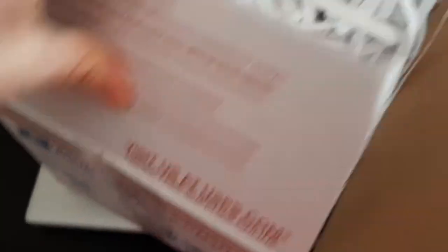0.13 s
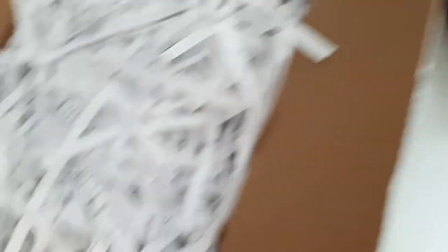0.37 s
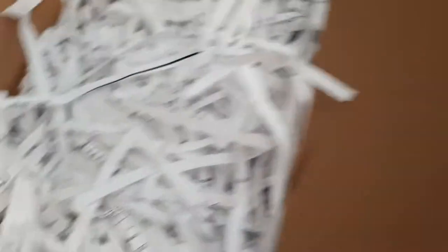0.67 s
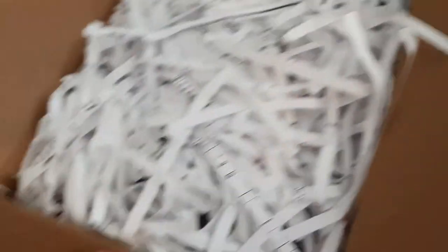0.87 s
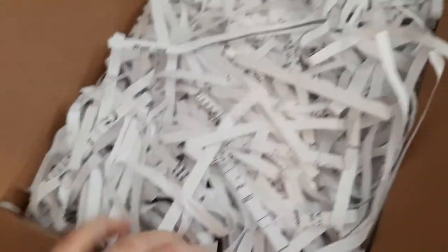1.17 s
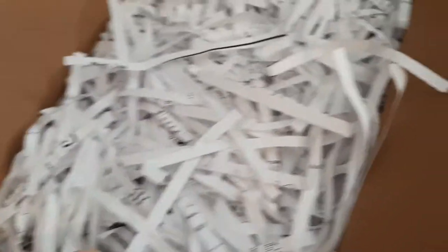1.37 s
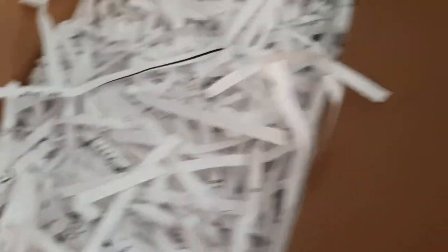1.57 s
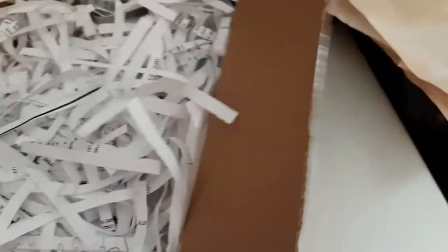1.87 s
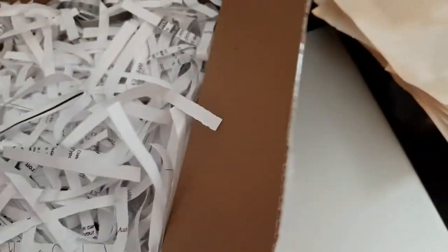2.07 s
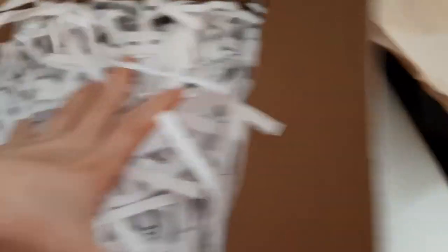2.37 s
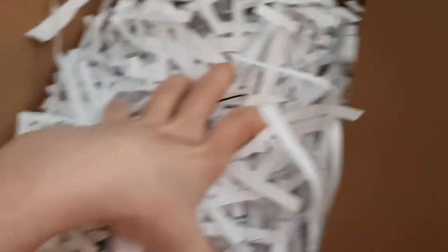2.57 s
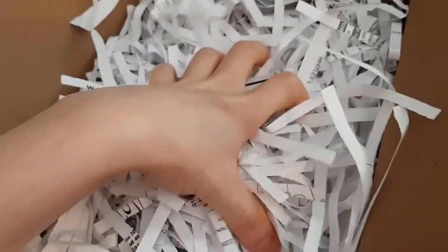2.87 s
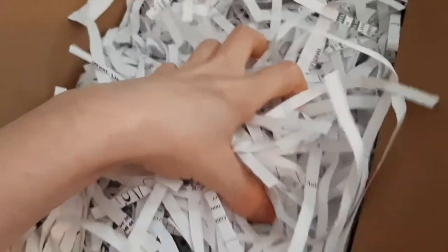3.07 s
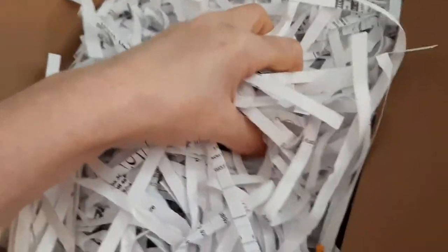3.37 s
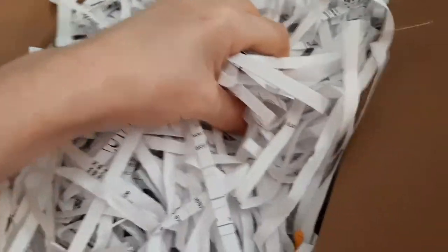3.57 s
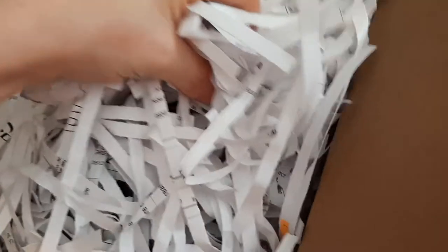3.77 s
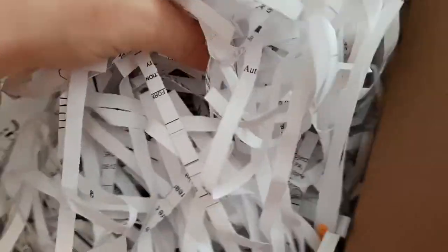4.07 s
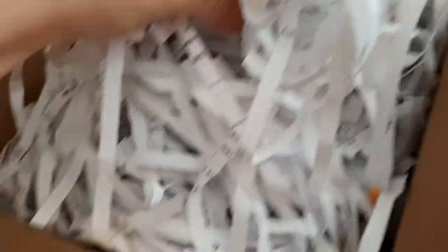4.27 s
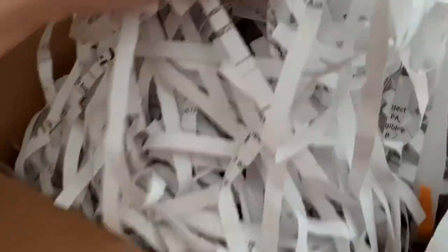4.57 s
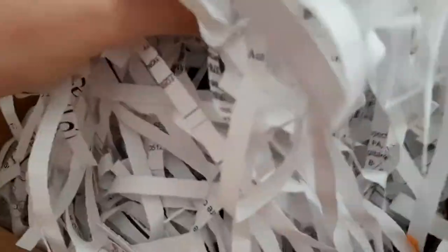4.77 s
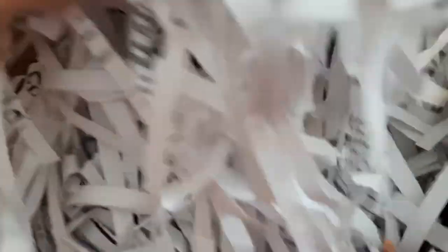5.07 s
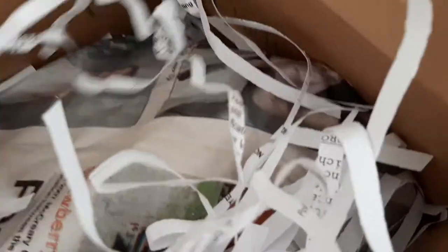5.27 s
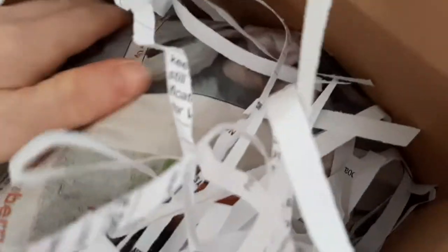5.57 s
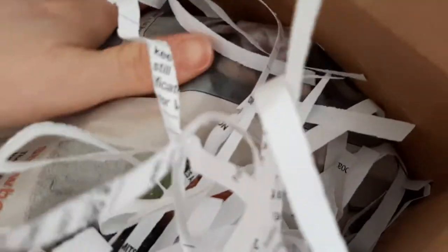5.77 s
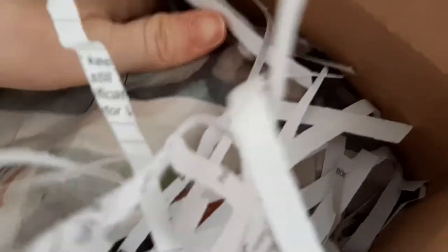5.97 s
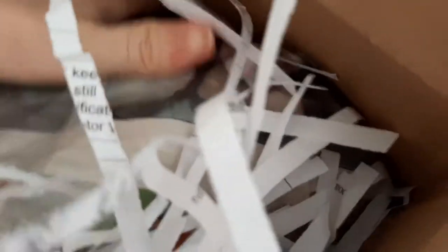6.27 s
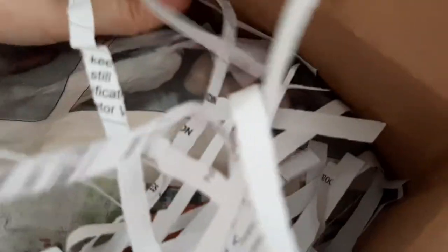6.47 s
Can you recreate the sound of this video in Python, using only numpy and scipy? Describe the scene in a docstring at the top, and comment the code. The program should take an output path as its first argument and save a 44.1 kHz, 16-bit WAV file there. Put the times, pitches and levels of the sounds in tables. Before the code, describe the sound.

Very close stereo sound of shredded paper handled in a cardboard box indoors. Brief swishes and soft box bumps come first, with quiet gaps; then fuller rustling, fizzing strip edges and crinkles peak through the middle. A bright loud snap marks the paper pulled aside, and the ending is coarser: low-pitched crackles, hollow wall knocks, deep thuds and handling rumble, leaning left. No echoing space.

```python
"""A hand digs through shredded paper in a cardboard box it has opened, close to a hand-held stereo microphone.
Strips slip over each other as dense clicks (fizz), buckle as short rings (crinkle) and snap as pitched bursts.
The box walls ring when rubbed and knocked, and deep thuds sound as the box shifts. Filtered noise makes the
low rumble of grip and sliding box, and the quiet room; close reflections surround paper and box."""
import sys
import numpy as np
from scipy import signal
from scipy.fft import rfft, irfft, next_fast_len
from scipy.io import wavfile
from scipy.ndimage import uniform_filter1d

SR = 44100
rng = np.random.default_rng(int(sys.argv[2]) if len(sys.argv) > 2 else 0)


def int16_out(signal):
    """Quantize to a 16-bit WAV file."""
    q = np.round(np.clip(np.atleast_2d(signal).T, -1, 1) * 32767)
    wavfile.write(sys.argv[1], SR, q.astype(np.int16))


N = 292383
T = np.arange(N) / SR

# modes of the cardboard walls when rubbed: hz, width_hz, level_db (relative)
WALL_MODES = [(353, 89, -0.5), (384, 50.3, 2), (411, 58, -0.5), (525, 93, 1.5), (567, 125, 1),
              (708, 70, -10.5), (858, 91, -6), (1166, 83, -4), (1580, 250, 3.5), (2210, 160, -6.5)]


def gain_of(db):
    """Decibels to gain."""
    return 10 ** (np.asarray(db) / 20)


def strokes():
    """Each stroke swells, holds and fades; squeeze and load follow the strongest of the moment."""
    # the hand overall: time_s, stirring between strokes rest_db, left over right lean_db, buckle_hz
    hand = [(0.0, -69, -5.5, 1370), (0.3, -82.5, -1, 1380), (0.62, -71, 4, 2400), (0.9, -73, -4, 2750),
            (1.05, -80, 2.5, 1500), (1.33, -64, -3, 1380), (1.72, -76.5, 3.5, 1910), (2.2, -70, 5, 2400),
            (2.7, -57, -0.5, 2270), (3.5, -43, -1, 2220), (3.8, -53.5, 0.5, 1970), (4.25, -72, -1, 1700),
            (4.9, -60.5, -1, 1710), (5.2, -55.5, 0.5, 2860), (5.5, -49, 5.5, 1600), (5.9, -53.5, 5, 1250),
            (6.63, -50, 6, 1630)]
    # strokes of the hand: full force start_s, hold_s, stirring level_db, swell_db_per_s, fade_db_per_s,
    # squeeze_db that makes strips buckle, load_db on the box walls
    stroke_list = [(0.386, .06, -66.5, 201.5, 100, -14, 17.5), (0.521, 0.022, -54, 115, 260, -3, 0.5),
                   (0.656, 0.0096, -51.5, 181, 144, -18, -5.5), (0.866, 0.067, -43.5, 133, 200, -2.5, -16),
                   (1.045, 0.017, -44.5, 116, 311, -1, 3.5), (1.248, .03, -53, 153, 75, -10, 1.5),
                   (1.407, 0.017, -58.5, 102, 100, 13, -0.5), (1.513, 0.024, -56, 80, 194, -15, -8),
                   (1.566, .002, -45.5, 130, 370, -4, 4), (1.905, 0.032, -55, 105, 196, -24, -6),
                   (1.977, 0.014, -49.5, 104, 550, 0, -0.5), (2.306, 0.045, -57, 187, 100, -15, -27),
                   (2.388, 0.22, -51, 128, 96, -2.5, -1.5), (2.659, .002, -42.5, 95, 400, -5, -8.5),
                   (2.806, .002, -40, 174, 212, -3.5, -8), (2.857, 0.23, -46, 98, 100, -2, -3.5),
                   (3.254, 0.079, -39, 89, 152, 1, -2.5), (3.432, .002, -37.5, 80, 300, 1, -0.5),
                   (3.487, 0.14, -44, 194, 200, 2, -2), (3.673, 0.015, -41.5, 124, 150, 3.5, 4.5),
                   (3.736, 0.1, -38.5, 150, 125, 7, -1.5), (3.989, 0.092, -39, 552, 103, 3, 0.5),
                   (4.48, .01, -45, 23.5, 195, 1, 2), (4.668, 0.038, -41, 146, 89, 5, 3.5),
                   (4.785, 0.13, -48, 91, 120, -2.5, 0.5), (5.035, 0.079, -39.5, 263, 354, -3, -4.5),
                   (5.156, 0.02, -34.5, 600, 720, -1, -1), (5.193, .09, -43, 200, 260, -11, -2),
                   (5.47, 0.21, -45.5, 106, 100, -0.5, 2.5), (5.77, 0.053, -52.5, 105, 117.5, 12.5, 14),
                   (6.038, .002, -46.5, 111, 152, 12, 7), (6.184, 0.086, -45, 92, 262, 6, 2),
                   (6.39, 0.056, -43, 135, 120, 7, 5.5), (6.54, .002, -47, 350, 98, 10.5, 5)]
    rest_squeeze_db, rest_load_db = -2.5, 3.5  # between strokes

    t = T[::32]
    time_s, *curves = np.transpose(hand)
    rest_db, lean_db, buckle_hz = (np.interp(t, time_s, c) for c in curves)
    start_s, hold_s, level_db, swell, fade, squeeze_db, load_db = np.transpose(stroke_list)[:, :, None]

    before_s = np.maximum(start_s - t, 0)
    after_s = np.maximum(t - start_s - hold_s, 0)
    power = gain_of(2 * (level_db - swell * before_s - fade * after_s))
    rest = gain_of(2 * rest_db)
    total = power.sum(axis=0) + rest

    # averages weighted by power
    squeeze = ((power * squeeze_db).sum(axis=0) + rest * rest_squeeze_db) / total
    load = ((power * load_db).sum(axis=0) + rest * rest_load_db) / total
    stir_db = 10 * np.log10(total)
    return [np.interp(T, t, c) for c in (stir_db, squeeze, load, lean_db, buckle_hz)]


STIR_DB, SQUEEZE_DB, LOAD_DB, LEAN_DB, BUCKLE_HZ = strokes()


def evened(x):
    """Scales to an rms of one, over both channels together."""
    return x / np.sqrt(np.mean(x ** 2) + 1e-20)


def colour(x, points):
    """Filters by a spectrum drawn on a log-frequency axis."""
    size = next_fast_len(N)
    point_hz, point_db = np.transpose(points)
    hz = np.fft.rfftfreq(size, 1 / SR)
    db = np.interp(np.log(hz + 1), np.log(point_hz + 1), point_db)
    return irfft(rfft(x, size) * gain_of(db), size)[..., :N]


def ring(x, hz, width_hz):
    """One mode: a click of height one starts a dying sine of height one."""
    r, w = np.exp(-np.pi * width_hz / SR), 2 * np.pi * hz / SR
    return signal.lfilter([0, np.sin(w)], [1, -2 * r * np.cos(w), r * r], x)


def sides(lean_db):
    """Left and right gains, lean_db apart."""
    return gain_of(np.array([lean_db / 2, -lean_db / 2]))


def clumps(seconds):
    """Slow chance of unit spread: paper gives way in bunches."""
    size = max(round(seconds * SR), 2)
    once = uniform_filter1d(rng.standard_normal(N), size)
    return evened(uniform_filter1d(once, size))


def gives(per_s, fade_s):
    """Bunches of strips let go suddenly and settle slowly."""
    starts = (rng.random(N) < per_s / SR) * np.minimum(rng.exponential(1, N), 3)
    return signal.lfilter([1], [1, -np.exp(-1 / (fade_s * SR))], starts)


def slips(per_s, spread_db, clump_db, clump_s, reach_s):
    """Clicks at scattered places: each reaches the two microphones at its own small time difference."""
    chance, strength, sign, place = rng.random((4, N))
    at = np.flatnonzero(chance < per_s / SR)
    size_db = spread_db * np.minimum(-np.log(strength + 1e-9), 5) + clump_db * clumps(clump_s)
    size = (gain_of(size_db) * np.sign(sign - .5))[at]

    # the left, nearer the paper, tends to hear it first
    lag_s = reach_s * (2 * place[at] - 1) + 1e-4 + 2e-5 * LEAN_DB[at]
    right_at = np.clip(at + np.round(lag_s * SR).astype(int), 0, N - 1)
    out = np.zeros((2, N))
    out[0, at] = size
    np.add.at(out[1], right_at, size)
    return out


def fizz():
    """Countless strip edges sliding: dense tiny clicks, each frequency band in its own bunches."""
    # colour of the sliding edges: hz, level_db (per Hz, relative)
    fizz_spectrum = [(300, -16), (1000, -9), (2000, -6), (4000, -4.5), (7000, -3), (16000, 5)]
    # level of the top treble band: time_s, level_db
    sheen = [(0.3, 1), (.75, -4.5), (.95, -8), (1.1, -1), (5.4, -0.5), (6.0, -4.5)]

    shared = 1 + 0.81 * gives(60, fade_s=0.0026)
    out = np.zeros((2, N))
    for low_hz, high_hz in [(300, 3000), (3000, 6000), (6000, 10500), (10500, 18000)]:
        edges = slips(5000, spread_db=2.5, clump_db=1.5, clump_s=0.0068, reach_s=2.5e-4)
        band_filter = signal.butter(2, [low_hz, high_hz], "bandpass", fs=SR, output="sos")
        band = signal.sosfilt(band_filter, evened(edges))
        if low_hz > 8000:  # only the finest edges
            band *= gain_of(np.interp(T, *np.transpose(sheen)))
        out += band
    return gain_of(STIR_DB + 3.5) * evened(colour(shared * out, fizz_spectrum))


def crinkle():
    """Buckling strips: short rings, each strip at its own pitch, loudest near the buckling pitch."""
    out = np.zeros((2, N))
    for hz in np.geomspace(1100, 5200, num=12):
        near = gain_of(-3.0 * np.log2(hz / BUCKLE_HZ) ** 2) + 0.052
        near = near * (hz / 2000) ** 0.36
        bends = slips(400, spread_db=2.0, clump_db=4.0, clump_s=0.0054, reach_s=0.00021)
        rings = ring(ring(bends, hz, 0.28 * hz), hz, 0.28 * hz)  # twice: a soft start
        out += near * evened(rings)
    return gain_of(STIR_DB + SQUEEZE_DB - 6.0) * evened(out)


def snaps():
    """Each snap is a brief burst ringing at the strip's pitch, with a wide tick and some sizzle."""
    # single strips snapping: start_s, level_db, pitch_hz
    snap_list = [(0.7814, -40, 4000), (1.3114, -43, 5600), (1.522, -33.5, 2130), (1.556, -24, 7540),
                 (1.9769, -21.5, 1880), (2.48, -37, 8000), (2.732, -28.5, 2550), (2.7981, -22, 7640),
                 (2.9374, -26, 9000), (2.943, -25, 9000), (2.997, -27, 2660), (3.0812, -31, 4500),
                 (3.0837, -28, 3240), (3.251, -27, 3300), (3.299, -28, 2930), (3.3456, -28, 2900),
                 (3.3599, -35, 4200), (3.3973, -24.5, 2200), (3.4288, -25, 1770), (3.5956, -28, 3200),
                 (3.683, -20, 7150), (3.734, -23.5, 1590), (3.8319, -27, 2080), (3.8463, -27, 7300),
                 (3.9884, -30, 9100), (4.0717, -30, 1530), (4.4224, -41, 8000), (4.44, -28, 2870),
                 (4.6358, -32, 2330), (4.6963, -31, 1660), (4.956, -36.5, 1550), (5.0994, -27, 4400),
                 (5.119, -30, 8000), (5.1606, -11, 5260), (5.206, -31, 2210), (5.3897, -25.5, 2620),
                 (5.501, -23.5, 3850), (5.6281, -27, 4020), (6.0332, -22, 1210), (6.04, -25.5, 4500),
                 (6.0732, -20, 1670), (6.132, -30.5, 1300), (6.246, -28, 1050), (6.275, -22, 1630),
                 (6.2891, -26, 4000), (6.3534, -30.5, 1070), (6.3718, -23.5, 3530), (6.396, -26.5, 925),
                 (6.407, -19, 2140), (6.4268, -23, 1650), (6.4417, -25, 4430), (6.4537, -25.5, 7650),
                 (6.501, -33, 5900), (6.5357, -26, 1480), (6.5923, -26, 2670)]
    tick_db, sizzle_db = -5.0, -9.0  # against the ring of the strip
    sizzle_db_per_octave = 8.0  # lower strips sizzle less, below 2600 Hz

    out, t = np.zeros((2, N + 1000)), np.arange(600) / SR
    burst = (t / .0008) ** 1.88 * np.exp(-t / 0.0005)
    noises = rng.standard_normal((len(snap_list), 3, 600))
    for (start_s, level_db, hz), noise in zip(snap_list, noises):
        shake = (noise[2] + 0.19 * noise[:2]) * burst  # nearly alike in both microphones
        flex = np.diff(shake, prepend=0)  # a thin strip radiates no bass
        body = ring(ring(flex, hz, .5 * hz), hz, .5 * hz)
        tick = ring(flex, 6200, 3400)
        sizzle = np.diff(shake, n=2, prepend=0, append=0)

        pitch_db = sizzle_db_per_octave * min(np.log2(hz / 2600), 0)
        parts = [(0, body), (tick_db, tick), (sizzle_db + pitch_db, sizzle)]
        snap = sum(gain_of(db) * x / abs(x).max(axis=1, keepdims=True) for db, x in parts)
        snap = snap / abs(snap).max(axis=1, keepdims=True)

        lean_db = LEAN_DB[round(start_s * SR)]
        right_lag = max((0.000066 + 2e-5 * lean_db) * SR, -20)  # samples
        for ear in range(2):
            i = round(start_s * SR + ear * right_lag)
            out[ear, i:i + 600] += sides(lean_db)[ear] * gain_of(level_db) * snap[ear]
    return out[:, :N]


def hollow(x):
    """The air in the box rings along with the paper."""
    # modes of the air inside the box: hz, width_hz, level_db
    air_modes = [(1579, 45, 1.5), (2080, 31, 0), (2980, 97, -9)]
    return x + sum(gain_of(db) * 2 * np.pi * w / SR * ring(x, hz, w) for hz, w, db in air_modes)


def wall_rub():
    """The paper mass rubs the walls and excites each mode in its own bunches."""
    rub = np.zeros((2, N))
    for hz, width_hz, level_db in WALL_MODES:
        rubs = slips(700, spread_db=3, clump_db=3.5, clump_s=0.01, reach_s=0.0003)
        rub += gain_of(level_db) * ring(evened(rubs), hz, width_hz)
    return gain_of(STIR_DB + LOAD_DB - 3.0) * evened(rub) * sides(LEAN_DB)


def wall_knocks():
    """Knuckles and flaps push the walls briefly; modes near the pitch of the spot struck ring most."""
    # knocks on the box walls: start_s, level_db (relative), pitch_hz of the spot struck
    knock_list = [(0.371, -47, 534), (0.511, -32, 490), (0.832, -38, 325), (0.983, -35, 662),
                  (1.027, -26, 520), (1.032, -21, 450), (1.037, -15.5, 620), (1.041, -24, 900),
                  (1.055, -36, 396), (1.55, -30, 374), (1.945, -25.5, 306), (1.975, -25, 443),
                  (3.982, -41, 390), (4.675, -22.5, 468), (4.698, -16, 778), (5.436, -25, 378),
                  (5.515, -26.5, 328), (5.724, -28, 500), (5.953, -24.5, 416), (6.033, -21, 600),
                  (6.039, -13, 407), (6.275, -33, 353), (6.393, -21.5, 367), (6.422, -22.5, 355),
                  (6.501, -24, 534), (6.62, -21.5, 434)]
    blow_s = 0.00015  # standard deviation of the bell-shaped push

    out, t = np.zeros((2, N + 3000)), np.arange(3000) / SR
    push = np.exp(-((t - .001) / blow_s) ** 2 / 2)
    for start_s, level_db, spot_hz in knock_list:
        modes = np.zeros(3000)
        for k, (hz, width_hz, mode_db) in enumerate(WALL_MODES):
            near_db = mode_db - 8.5 * np.log2(hz / spot_hz) ** 2
            # knocked modes die faster than rubbed ones and alternate in sign
            modes += (-1) ** k * gain_of(near_db) * ring(push, hz, 1.74 * width_hz)
        i = round(start_s * SR)
        knock = modes / abs(modes).max()
        out[:, i:i + 3000] += gain_of(level_db - 9.0) * sides(LEAN_DB[i])[:, None] * knock
    return out[:, :N]


def echoes(x, t60):
    """Sparse reflections of random sign inside the box and the room, dying fast."""
    taps = np.zeros((2, 8000))
    at = np.arange(60, 7980, 20) + rng.integers(0, 20, (2, 396))
    np.put_along_axis(taps, at, rng.choice([-1., 1.], at.shape), 1)
    taps *= gain_of(-60 * np.arange(8000) / SR / t60)
    return signal.oaconvolve(x, taps / np.linalg.norm(taps[0]), axes=1)[:, :N]


def thuds():
    """A soft pull as the box shifts, with a swing before it and a longer one after."""
    # deep thuds: start_s, level_db (relative), pitch_hz
    thud_list = [(0.381, -39, 81), (0.493, -33, 109), (0.513, -32.5, 100), (0.642, -41.5, 99.6),
                 (0.837, -50, 105), (0.997, -43, 103), (1.055, -36.5, 124), (1.557, -36.5, 146),
                 (1.942, -40.5, 104), (1.98, -41.5, 108), (5.176, -34, 165), (5.512, -27, 105),
                 (6.27, -38.5, 84), (6.415, -23, 106)]
    out, t = np.zeros((2, N + 3000)), np.arange(3000) / SR
    for start_s, level_db, hz in thud_list:
        i = round(start_s * SR)
        turns = hz * t - 1.2  # cycles from the strongest pull
        fade_turns = np.where(turns < 0, .7, 1.2)
        shape = np.cos(2 * np.pi * turns) * np.exp(-(turns / fade_turns) ** 2)
        # 1 dB further to the left than the paper
        out[:, i:i + 3000] -= gain_of(level_db + 0.5) * shape * sides(1.0 + LEAN_DB[i])[:, None]
    return out[:, :N]


def rumble():
    """Lumpy bass noise from the grip and the sliding box, mostly alike in both microphones."""
    # rumble over time: time_s, level_db
    rumble_level = [(0.0, -69), (0.53, -54), (0.72, -65), (0.92, -52), (1.1, -63), (1.55, -53), (1.75, -63),
                    (2.3, -66), (2.5, -59), (3.27, -53), (4.26, -54.5), (4.68, -61), (4.86, -53.5),
                    (5.67, -46), (5.89, -51.5), (6.63, -49)]
    # its colour: hz, level_db (per Hz, relative)
    bass_spectrum = [(20, -19), (40, -31), (70, -2.5), (110, -3), (160, -9.5), (220, -7), (300, -37),
                     (500, -44)]
    a, b = rng.standard_normal((2, N))
    bass = evened(colour(np.array([a, .8 * a + .6 * b]), bass_spectrum))
    pair = bass * sides(4.0 + LEAN_DB)  # 4 dB further to the left than the paper
    level_db = np.interp(T, *np.transpose(rumble_level)) + 3.4 * clumps(0.037)
    return gain_of(level_db) * pair


def hush():
    """The steady air of the room: coloured noise, partly shared by both microphones."""
    # colour of the quiet room: hz, level_db (per Hz, relative)
    room_spectrum = [(18, -36), (30, -5.5), (98, 2), (266, -14.5), (319, -6.5), (600, -19), (1500, -25.5),
                     (3140, -77), (7670, -49), (8740, -52), (12000, -48), (16000, -34)]
    a, b = rng.standard_normal((2, N))
    room = colour(np.array([a, 1.26 * a + 0.85 * b]), room_spectrum)
    return gain_of(-59) * evened(room)


def scene():
    """Paper and box, their near reflections, and the room."""
    hits = hollow(snaps()) + wall_knocks()
    paper = hollow(fizz() + crinkle()) * sides(LEAN_DB) + wall_rub()
    near = gain_of(-8.5) * echoes(hits + paper, t60=.05)  # seconds
    return paper + hits + near + thuds() + rumble() + hush()


def record(dry):
    """Microphone colour, narrow treble image, band limit."""
    # response of the microphone: hz, level_db
    mic_response = [(15, -17), (45, 1), (70, 0), (5700, 2.5), (7000, 1.5), (7900, 5.5), (8700, -7.5),
                    (10200, -3), (11400, 1.5), (12800, -0.5), (16000, -4)]
    # the image narrows in the treble: hz, side_db
    image_width = [(6500, 0), (7300, -2), (8200, -10), (16000, -10)]
    mid = (dry[0] + dry[1]) / 2
    side = colour((dry[0] - dry[1]) / 2, image_width)
    heard = colour(np.array([mid + side, mid - side]), mic_response)
    low_pass = signal.firwin(511, 15900, window=("kaiser", 9), fs=SR)  # cutoff in Hz
    return signal.oaconvolve(heard, low_pass[None], "same")


dry = scene()
out = record(dry)
int16_out(out)
```